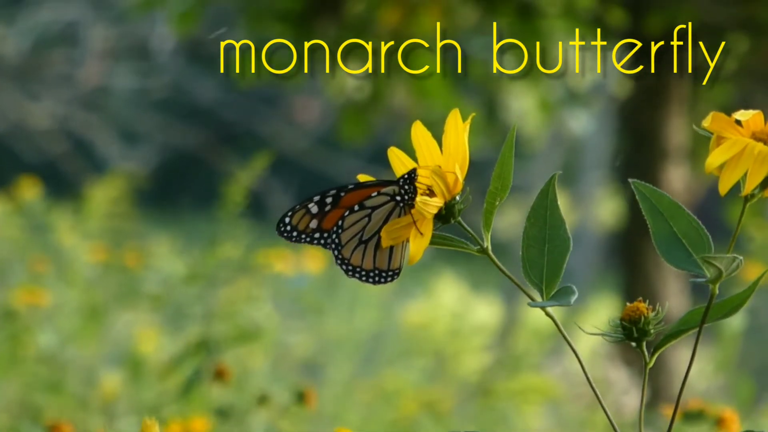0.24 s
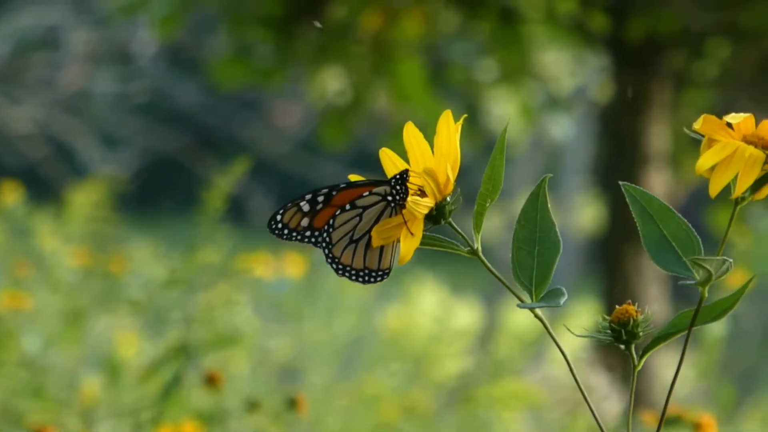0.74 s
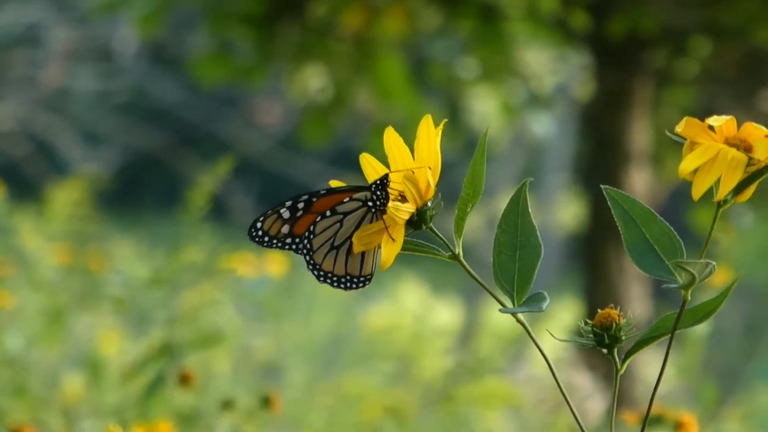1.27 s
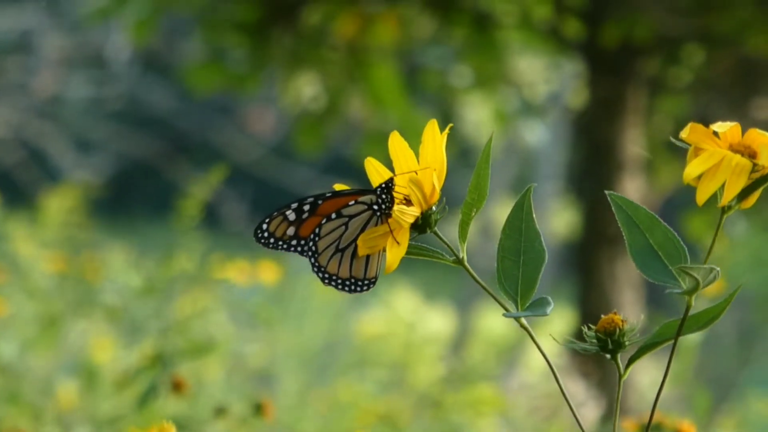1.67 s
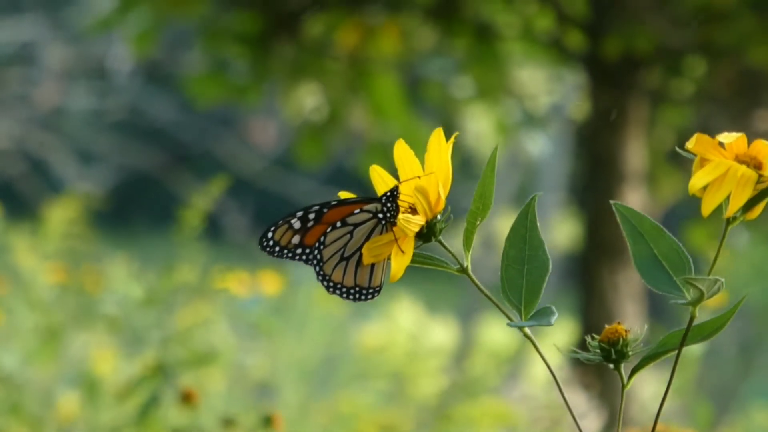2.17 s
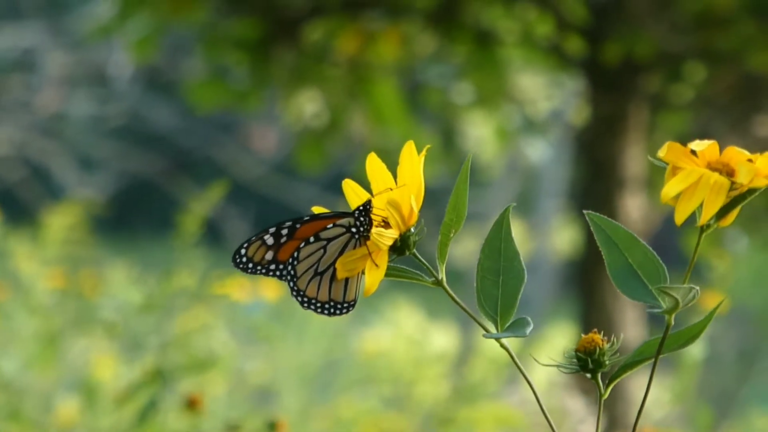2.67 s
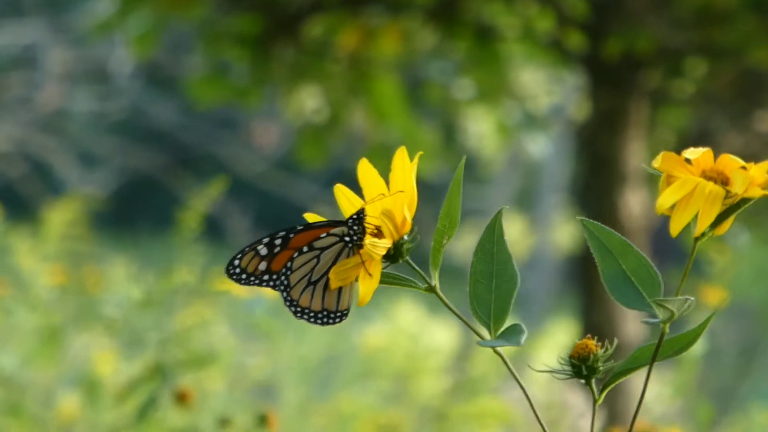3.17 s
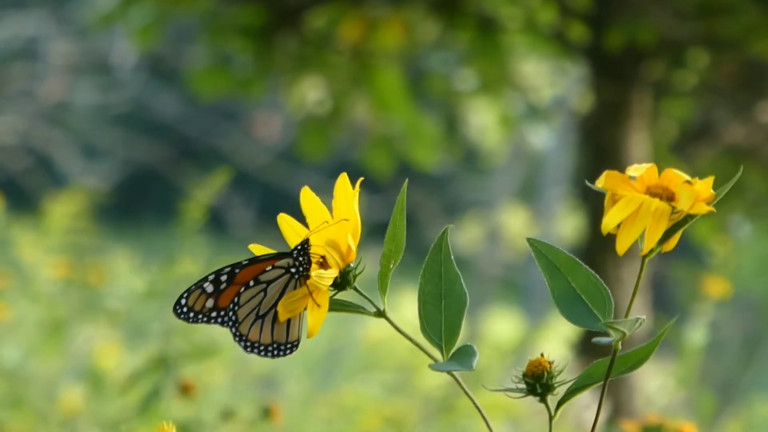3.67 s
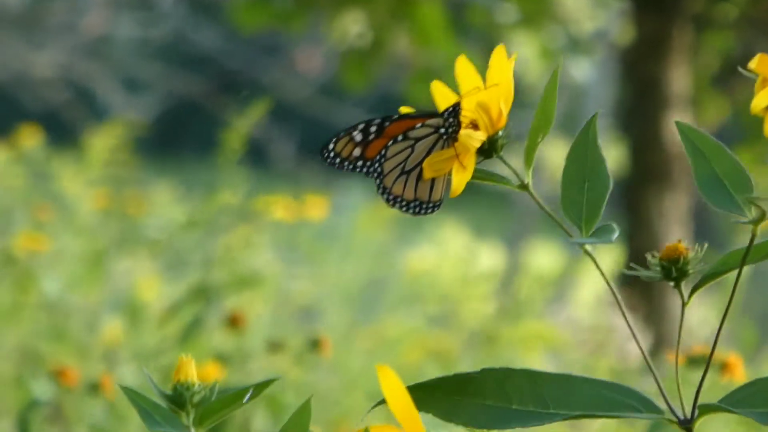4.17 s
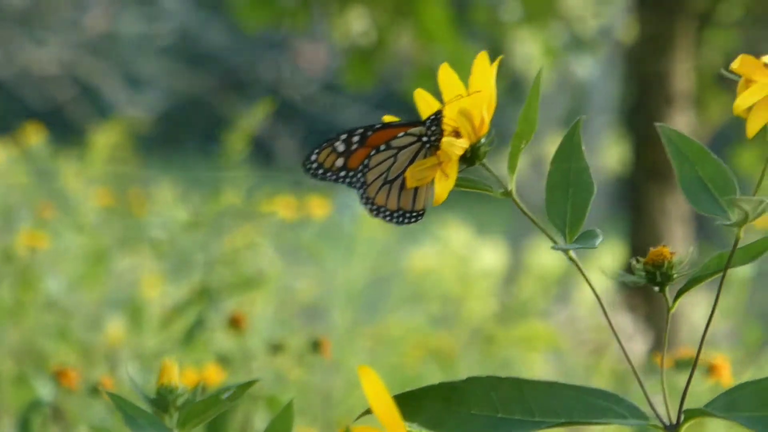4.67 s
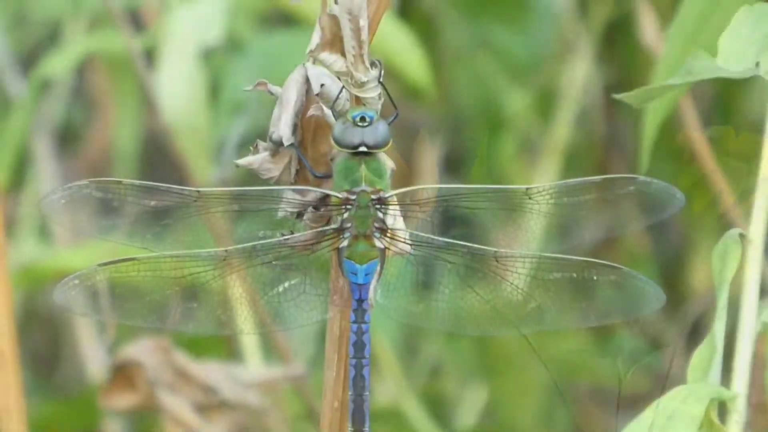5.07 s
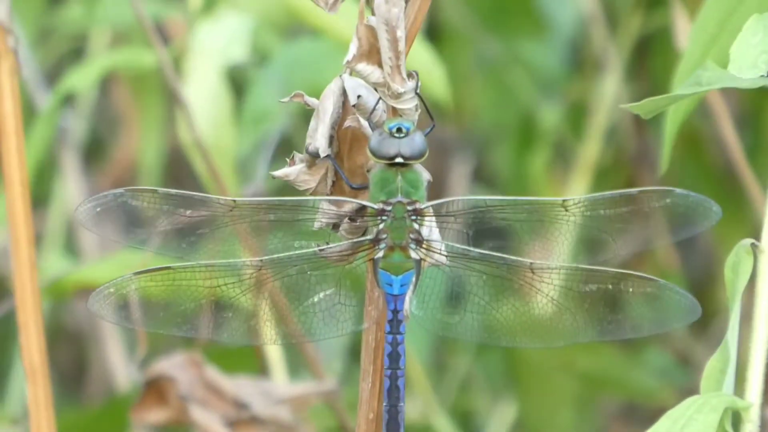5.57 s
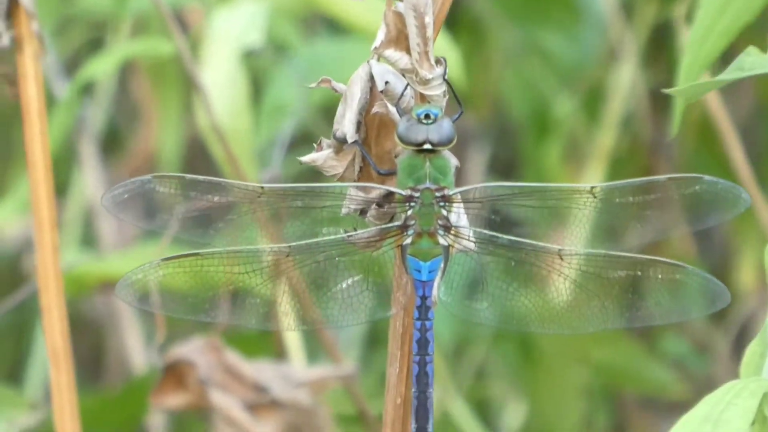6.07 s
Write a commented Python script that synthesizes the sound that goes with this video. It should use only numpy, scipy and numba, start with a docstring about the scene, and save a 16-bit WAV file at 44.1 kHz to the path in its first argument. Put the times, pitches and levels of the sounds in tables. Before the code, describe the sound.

Summer meadow insects: one close cicada buzzes and slides down repeatedly above a shrill distant chorus, until only the swelling chorus remains.

```python
"""Cicada in a summer meadow

One near cicada sings wee-oh phrases: drum clicks ring body resonances that slide down.
Behind it lie a dense far chorus of noise bands, a low noise rumble, wind buffets and a hollow drone.
Near the end it dissolves into a second spot, where the chorus stays over a different soft rumble."""
import sys
import numpy as np
from scipy import signal
from scipy.fft import rfft, irfft, next_fast_len
from scipy.io import wavfile
from scipy.ndimage import uniform_filter1d
from numba import njit

SR = 44100
rng = np.random.default_rng(int(sys.argv[2]) if len(sys.argv) > 2 else 0)


def materialize(psi):
    """Save the field psi as 16-bit PCM at rate SR to the path in sys.argv[1].

    A 1-D psi becomes a single channel; in a 2-D psi each row is a channel.
    """
    bounded = np.clip(np.atleast_2d(psi).T, -1, 1)
    quanta = np.round(bounded * 32767).astype(np.int16)
    wavfile.write(sys.argv[1], SR, quanta)


N = 279594
BINS = next_fast_len(N)  # FFT length
DISSOLVE_S = (4.67, 5.2)  # start, end


def undb(db):
    """Gain of a level in dB."""
    return 10 ** (np.asarray(db) / 20)


def level(x, db):
    """Scale to an rms level in dB."""
    return x * undb(db) / np.sqrt(np.mean(x ** 2))


def ramp(t, start_s, takes_s):
    """Smooth rise from 0 to 1."""
    return np.sin(np.pi / 2 * np.clip((t - start_s) / takes_s, 0, 1)) ** 2


def along(table):
    """Columns of a curve table, one value a sample."""
    s, *columns = np.transpose(table)
    return [np.interp(np.arange(N) / SR, s, c) for c in columns]


def on_log(table):
    """A spectrum table read at every bin, linear in log frequency."""
    hz, value = np.transpose(table)
    bin_hz = np.arange(BINS // 2 + 1) * SR / BINS
    return np.interp(np.log(bin_hz + 1), np.log(hz), value)


def spread(pair, alike, colour_db):
    """Mix two unrelated sounds into left and right with a given correlation, then colour them."""
    mid, side = rfft(pair, BINS)
    alike = np.clip(alike, -1, 1)
    mid = mid * np.sqrt(1 + alike)
    side = side * np.sqrt(1 - alike)
    left_right = np.array([mid + side, mid - side])
    return irfft(left_right * undb(colour_db), BINS)[:, :N]


def clicks(s, size):
    """Windowed-sinc clicks placed between samples."""
    at = s * SR
    index = np.floor(at).astype(int)[:, None] + np.arange(-7, 9)
    gap = index - at[:, None]
    window = np.cos(np.pi * gap / 16) ** 2
    shape = np.sinc(gap) * window * size[:, None]
    inside = (index >= 0) & (index < N)
    return np.bincount(index[inside], shape[inside], N)


@njit
def svf(x, hz, width):
    """State-variable band-pass with a moving centre, gain 1 there."""
    y, b, l = np.empty(len(x)), 0., 0.
    for i in range(len(x)):
        g, k = np.tan(np.pi * hz[i] / SR), width / hz[i]
        v = (b + g * (x[i] - l)) / (1 + g * (g + k))
        b, l, y[i] = 2 * v - b, l + 2 * g * v, k * v
    return y


def resonate(x, hz, width_hz):
    """Two equal band-passes in series."""
    width_hz = float(width_hz)
    return svf(svf(x, hz, width_hz), hz, width_hz)


def walk(rate_hz):
    """Random levels, each held 1 / rate and slewed twice; spread near 1."""
    hold = int(SR / rate_hz)
    steps = np.repeat(rng.standard_normal(N // hold + 1), hold)
    return 1.42 * uniform_filter1d(uniform_filter1d(steps, hold), hold)[:N]


def song():
    """Muscle rate, speed-up, belly drop and level: controls rise into a phrase end, then relax."""
    # phrases: end of low note t/s, buzz muscle rate f/Hz, low-note muscle rate f/Hz,
    # level before effort/dB
    phrases = [(-.13, 137.5, 208.1, -29.5), (.437, 140.8, 208.2, -28.5), (1.005, 142.9, 207.8, -27.5),
               (1.566, 143.7, 208.9, -27), (2.13, 146.3, 209, -27.5), (2.686, 146.1, 209.5, -26.5),
               (3.225, 147.4, 208.8, -27), (3.773, 148.9, 209.4, -26.5), (4.316, 149.8, 210.4, -27),
               (4.856, 148.4, 210.7, -32), (5.4, 149.5, 212.4, -22)]
    # (start relative to phrase end, as a lead; rise time)
    speed_up_s, swell_s, belly_drop_s = (.24, .16), (0.18, 0.062), (.13, 0.079)
    speed_relax_s, belly_relax_s = .012, 0.049
    sag_s, sag_share = .03, .018  # slight slowing just before the end
    effort_base_db, swell_db, swell_fade_db = -1, 3.5, -1.5

    t = np.arange(N) / SR
    ends, buzz_hz, note_hz, db = np.transpose(phrases)
    current = np.clip(np.searchsorted(ends, t), 1, len(ends) - 1)
    until = t - ends[current]  # negative before the end
    since = t - ends[current - 1]

    def rise(lead_s, takes_s):
        return ramp(until, -lead_s, takes_s)

    speeding = rise(*speed_up_s) - sag_share * rise(sag_s, sag_s)
    fast = np.maximum(speeding, np.exp(-since / speed_relax_s))
    belly = np.maximum(rise(*belly_drop_s), np.exp(-(since / belly_relax_s) ** 1.45))
    effort_db = effort_base_db + swell_db * rise(*swell_s) + swell_fade_db * rise(0.072, 0.029)
    buzz, note, db = (np.interp(t, ends, c) for c in (buzz_hz, note_hz, db))
    return buzz + (note - buzz) * fast, fast, belly, db + effort_db


def singer():
    """Drum clicks ring the sliding body; ragged in the buzz, a clean comb as the muscles speed up."""
    # two drums buckle in and spring out in turn: place in muscle cycle/0-1,
    # buzz level/dB, low-note level/dB (both relative)
    buckles = [(0, 0.5, 0.5), (0.099, -29, -29), (.28, -7.5, -9), (0.517, -3.5, 2.5), (.6, -15, -29),
               (0.768, -2.5, -27)]
    # resonances sliding down as the belly drops: buzz f/Hz, low-note f/Hz, width per pass/Hz,
    # buzz level/dB, low-note level/dB (both relative)
    resonances = [(6250, 4380, 800, 4.5, 4.5), (5370, 3683, 1780, 0.5, 1.5), (4000, 3215, 1220, -10.5, -1),
                  (3230, 2900, 350, -22, -14), (6010, 6045, 67, 5, -30)]
    # ribs rattling after each click: f/Hz, width per pass/Hz, buzz level/dB, low-note level/dB (relative)
    rattles = [(8210, 3570, -12.5, -34), (9710, 2250, -18, -34), (10650, 930, -19, -43)]
    buzz_jitter_s, note_jitter_s, scatter_db = .00004, .000004, 2.5
    rattle_s = 0.0069
    pan_db, leaves_db, leaves_t60_s = -2, -12.5, 0.41  # pan: left minus right

    hz, fast, belly, db = song()
    belly = np.clip(belly, 0, 1)
    cycles = np.cumsum(hz) / SR
    place, buzz_db, note_db = np.transpose(buckles)
    cycle_places = np.arange(int(cycles[-1]))[:, None] + place
    when = np.interp(cycle_places, cycles, np.arange(N) / SR)
    at = (when * SR).astype(int)
    drop, lock = belly[at], np.clip(fast[at], 0, 1)
    chance = rng.standard_normal((N // 100, len(place), 2))[:len(when)]
    when = when + chance[..., 0] * (buzz_jitter_s + (note_jitter_s - buzz_jitter_s) * lock)
    click_db = buzz_db + (note_db - buzz_db) * drop
    click_db = click_db + scatter_db * chance[..., 1] * (1 - .85 * lock)
    drums = clicks(when.ravel(), undb(click_db).ravel())

    body = 0
    for k, (high_hz, low_hz, width_hz, high_db, low_db) in enumerate(resonances):
        centre = high_hz + (low_hz - high_hz) * belly
        ring = resonate(drums, centre, width_hz)
        body = body + (-1) ** k * undb(high_db + (low_db - high_db) * belly) * ring  # alternating sign

    # noise under the decaying click energy
    fade = np.exp(-2 / (rattle_s * SR))
    envelope = np.sqrt(signal.lfilter([1 - fade], [1, -fade], drums ** 2))
    burst = envelope * rng.standard_normal(N)
    for centre_hz, width_hz, high_db, low_db in rattles:
        ring = resonate(burst, np.full(N, float(centre_hz)), width_hz)
        body = body + undb(high_db + (low_db - high_db) * belly) * ring
    direct = level(body, 0) * undb(db)

    # foliage scatters a short diffuse tail, different on each side
    t = np.arange(SR // 2) / SR
    tail = rng.standard_normal((2, len(t))) * undb(-60 * t / leaves_t60_s)
    tail /= np.sqrt(np.sum(tail ** 2, axis=1, keepdims=True))
    leaves = signal.fftconvolve(direct[None], tail, axes=1)[:, :N]
    return (direct + undb(leaves_db) * leaves) * undb(np.array([[pan_db], [-pan_db]]) / 2)


def rumble(colour, db, alike, pan_db):
    """Distant traffic and moving air: coloured noise, slowly wavering."""
    air = spread(rng.standard_normal((2, N)), on_log(alike), on_log(colour + [(6000, -70)]))
    return level(air, db) * undb(1.1 * walk(2.58) + np.array([[pan_db], [-pan_db]]) / 2)


def wind():
    """Wind on two microphone ports: soft low noise buffets, nearly unrelated left to right."""
    # buffets: t/s, level before flicker and pan/dB
    buffets = [(0, -51), (.5, -51), (1.3, -43), (1.77, -43), (2.45, -51), (2.85, -42.5), (3.1, -44.5),
               (3.6, -46.5), (4.2, -56), (5.2, -50)]
    flicker_db = 2.2
    # f/Hz, relative level/dB
    colour = [(20, -27), (40, -34), (75, 1.0), (170, 2.5), (240, -14), (500, -54)]
    db, = along(buffets)
    air = spread(rng.standard_normal((2, N)), -0.19, on_log(colour))
    return level(air, 0) * undb(db + flicker_db * walk(5.8) + np.array([[-.7], [.7]]))


def drone():
    """Swelling hollow drone, perhaps a far engine: one narrow and two broad noise bands, flickering apart."""
    # swells, before flicker: t/s, narrow hum level/dB, broad roar level/dB
    swells = [(0, -46.5, -49), (.7, -49, -46), (1.1, -60, -50.5), (1.3, -50, -50), (1.85, -52, -43),
              (2.07, -61, -54), (2.2, -51, -53), (2.75, -48, -44), (3.03, -71, -49.5), (3.6, -47, -48),
              (4.0, -53, -46), (4.08, -38.5, -42), (4.34, -38.5, -40.5), (4.42, -50, -42.5),
              (4.7, -52, -49.5), (4.85, -41.5, -48.5), (5.12, -46, -47.5), (5.25, -60, -63)]
    # hum centre: t/s, f/Hz
    hum_centre = [(0, 413), (.8, 420), (1.3, 401.3), (4, 389), (5.2, 385)]
    upper_roar_db, flicker_db = -3.5, 2.5  # upper roar relative to low roar
    hum_db, roar_db = along(swells)
    bands_db = (hum_db, roar_db, roar_db + upper_roar_db)
    hum_db, low_db, upper_db = (db + flicker_db * walk(8) for db in bands_db)
    hz, = along(hum_centre)
    noise = spread(rng.standard_normal((2, N)), 0.78, 0)
    out = []
    for side in noise:
        hum = level(svf(svf(side, hz, 38.0), hz, 58.0), 0)
        low = level(svf(side, np.full(N, 285.), 108.0), 0)
        upper = level(svf(side, np.full(N, 580.), 240.0), 0)
        out.append(hum * undb(hum_db) + low * undb(low_db) + upper * undb(upper_db))
    return np.array(out)


def chorus():
    """Countless far drums blur into a slightly grainy hiss; each pitch group swells on its own."""
    # course, before dark moments and swells: t/s, level/dB, low minus high half/dB, left minus right/dB
    course = [(0, -26, -4, 0), (.6, -25.5, -3, -0.5), (1.55, -27, -1, -1), (3.1, -27, 0, -1.3),
              (4.4, -26, 0, -1), (4.7, -28.5, -1.5, -1), (5.1, -25.5, -1.5, 1.5), (5.5, -23, -1.5, 1),
              (5.9, -23, -3, 1.3), (6.34, -23, -2.5, 1)]
    # colour: f/Hz, relative level per Hz/dB
    colour = [(1500, -74), (2300, -30), (2760, -20.5), (3400, -6), (3900, -3.5), (5100, -3), (6050, -3),
              (6800, -8.5), (7650, -17.5), (9120, -21.5), (11400, -27), (12800, -37.5), (13600, -40),
              (15400, -48)]
    # left-right correlation: f/Hz, correlation/0-1
    likeness = [(2500, 0.68), (3500, .86), (6500, 0.93), (9000, 0.57), (12000, 0.15), (15000, 0)]
    # pitch-group band edges: f/Hz
    edges_hz = [0, 3700, 4300, 4900, 5500, 6200, 7300, 9500, 12000, 22050]
    # dark moments, perhaps a farther singer's low note: t/s, added lean to low half/dB
    far_notes = [(.25, 2.5), (.75, 6.5), (1.84, 3), (2.3, 3), (2.87, 2.5), (4.5, 0.5), (5.07, 4), (6.34, 3)]
    far_note_s, far_note_lift = 0.043, 0.24  # half length to 1/e; dB of level per dB of lean
    split_hz, treble_lift_db = 5170, 1  # treble is lifted at the first spot

    t = np.arange(N) / SR
    db, tilt_db, pan_db = along(course)
    dark_db = sum(lean * np.exp(-((t - s) / far_note_s) ** 2) for s, lean in far_notes)
    db = db + far_note_lift * dark_db
    tilt_db = tilt_db + dark_db
    spray = rng.standard_normal((2, N)) * undb(0.14 * walk(500))  # grain
    hiss = spread(spray, on_log(likeness), on_log(colour))
    crowd = rfft(level(hiss, 0), BINS)
    hz = np.arange(crowd.shape[1]) * SR / BINS
    treble_db = np.interp(t, DISSOLVE_S, (treble_lift_db, 0))
    out = 0
    for low, high in zip(edges_hz, edges_hz[1:]):
        group = irfft(crowd * ((hz >= low) & (hz < high)), BINS)[:, :N]
        lean_db = tilt_db / 2 * np.tanh((split_hz - (low + high) / 2) / 600)
        swell_db = 0.9 * walk(8) + 0.81 * walk(20)
        out = out + group * undb(lean_db + treble_db * (low > 7000) + swell_db)
    return out * undb(db + np.array([pan_db, -pan_db]) / 2)


def scene():
    """The first spot fades out as the second fades in; the chorus spans both."""
    # rumble colour at each spot: f/Hz, relative level per Hz/dB
    colour_first = [(20, -38), (75, -6), (168, -12.5), (300, -3), (500, -9), (1000, -11), (2200, -18),
                    (3500, -25)]
    colour_late = [(20, -24), (40, -23), (75, -3.5), (146, 0), (220, -2), (450, -6.5), (800, -2.5),
                   (2200, -10.5), (3500, -30)]
    # rumble left-right correlation at each spot: f/Hz, correlation/-1 to 1
    alike_first = [(60, 0.4), (150, -0.33), (290, 0.62), (640, 0.41), (2500, 0.7)]
    alike_late = [(60, 1), (150, 0.68), (290, 0.55), (640, 0.53), (2500, 0.68)]
    t = np.arange(N) / SR
    late = np.interp(t, DISSOLVE_S, (0, 1))
    first = singer() + rumble(colour_first, -41.5, alike_first, -2.3) + wind()
    second = rumble(colour_late, -42, alike_late, -0.92)
    drone_out = drone() * (1 - ramp(t, DISSOLVE_S[1], .05))
    return first * (1 - late) + second * late + drone_out + chorus()


def record(dry):
    """Steep elliptic low-pass cuts the top."""
    top_hz = 15600
    return signal.sosfilt(signal.ellip(14, .5, 70, top_hz, fs=SR, output="sos"), dry)


dry = scene()
out = record(dry)
materialize(out)
```